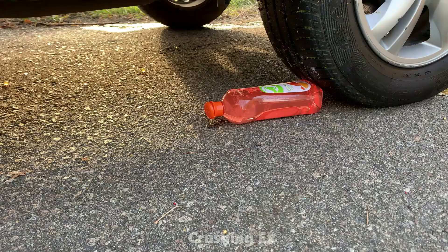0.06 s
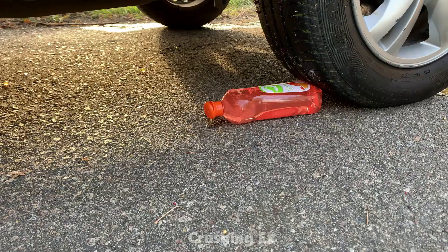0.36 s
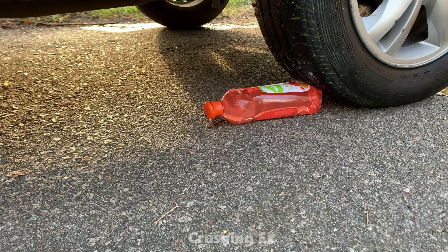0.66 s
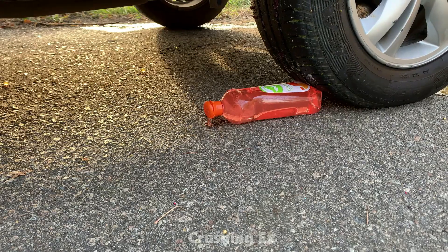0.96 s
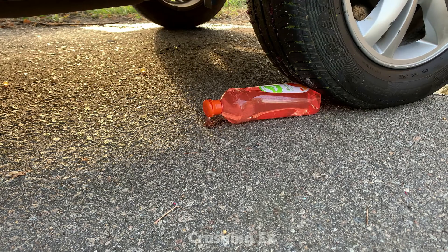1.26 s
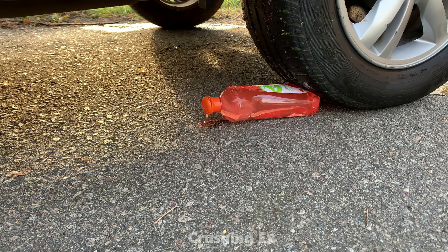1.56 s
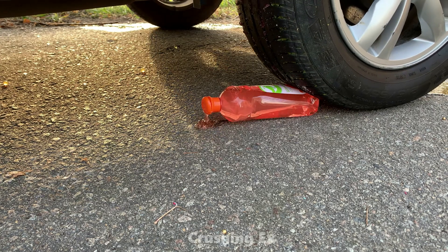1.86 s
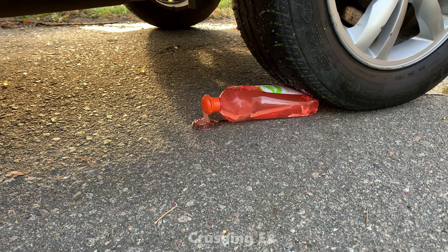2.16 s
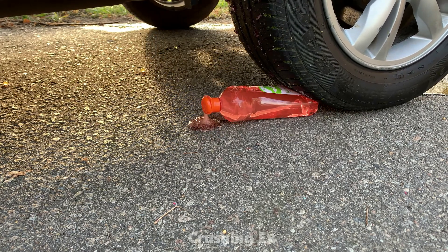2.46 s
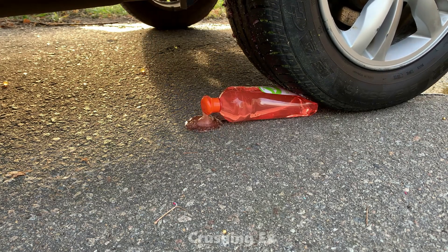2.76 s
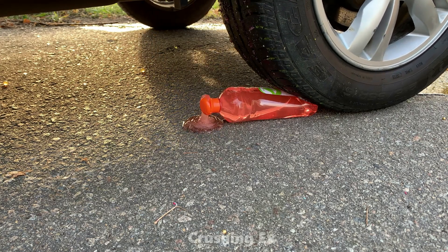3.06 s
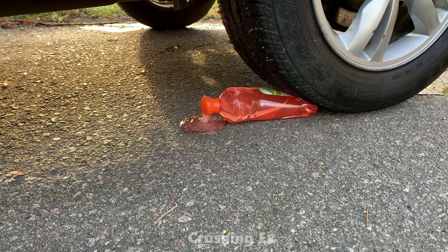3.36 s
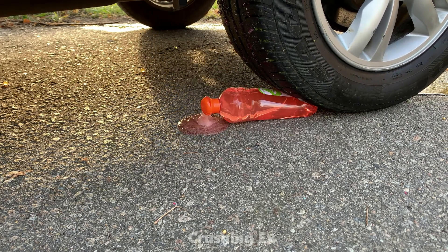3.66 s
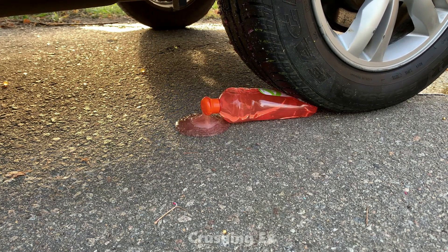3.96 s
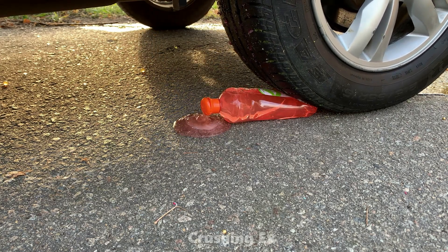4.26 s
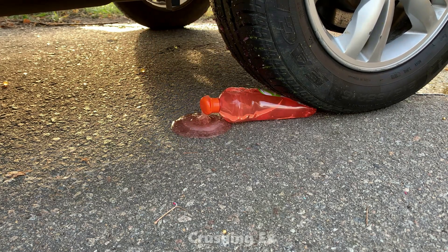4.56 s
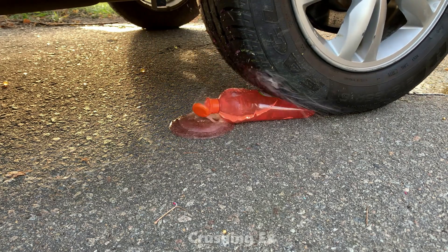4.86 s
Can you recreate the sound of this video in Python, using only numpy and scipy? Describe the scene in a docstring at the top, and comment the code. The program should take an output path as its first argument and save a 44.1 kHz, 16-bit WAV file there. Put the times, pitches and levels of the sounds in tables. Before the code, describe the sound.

A plastic bottle crackles under a slow tyre outdoors, fizzing at the cap before bursting into spray, over a quiet, squeaky idling engine.

```python
"""A car idles on asphalt in light wind, its engine rasping once per crank turn.
From 0.5 s it creeps onto a full plastic bottle: the wall buckles in sharp snaps, the shell scrapes
and creaks. From 1.65 s drink fizzes out past the cap in three bouts and glugs,
while the engine belt squeals and chirps in time with the crank. Near 4.8 s the seal gives way
and the spray splashes on the road."""
import sys
import numpy as np
from scipy import signal
from scipy.fft import rfft, irfft
from scipy.io import wavfile

SR = 44100
rng = np.random.default_rng(int(sys.argv[2]) if len(sys.argv) > 2 else 0)


def generate_wav(signal):
    """Clip the signal to [-1, 1] and save it as 16-bit WAV at the path in sys.argv[1]."""
    frames = np.transpose(np.atleast_2d(signal))
    scaled = np.clip(frames, -1, 1) * 32767
    pcm = np.round(scaled).astype(np.int16)
    wavfile.write(sys.argv[1], SR, pcm)


N = 225331
T = np.arange(N) / SR
CRANK_HZ, CRANK_LAG_S = 24.04, .021
TOP_HZ = 15900

# wall snaps: start_s, crack_db, low_panel_db, high_panel_db, ribs_db, crack_t60_s, nearest_rib_hz
WALL_SNAPS = [(0.5359, -48, -56.5, -56, -58, 0.011, 5400), (1.468, -70, -74, -80, -49, 0.022, 4400),
              (.912, -42, -54, -49, -43, 0.0064, 4700), (1.2635, -33, -45, -86, -33.5, 0.0044, 4500),
              (1.2865, -39, -50, -80, -38, 0.0067, 6300), (1.487, -36.5, -47.5, -89, -36.5, 0.008, 5940),
              (1.5416, -40.5, -57, -79, -38, 0.012, 6200), (1.6133, -30, -47, -32.5, -31, 0.042, 5900),
              (1.68, -44.5, -62, -52, -49, 0.046, 6200), (2.3354, -27, -56, -38, -33.5, 0.013, 5000),
              (2.7591, -19, -21, -20, -34.5, 0.055, 7300), (3.06, -36.5, -31.5, -44.5, -25, 0.026, 4220),
              (4.6858, -20, -65, -48, -25, 0.012, 5670)]
# wall panel and moulded rib modes: pitch_hz, t60_s, level_db
LOW_PANEL_MODES = [(650, 0.032, -35), (839, .04, -32.5), (1040, 0.044, -6.5), (1211, .06, 1.5),
                   (1312, .045, -10.5), (1452, 0.16, -13.5), (1660, 0.18, -26)]
HIGH_PANEL_MODES = [(2290, 0.041, 0), (2382, 0.045, -0.5), (2284, 0.079, -13), (2580, 0.076, -6),
                    (2720, 0.075, -16.5), (3274, 0.13, -15), (3890, 0.094, -14)]
RIB_MODES = [(4190, 0.023, -8), (4530, .04, -5.5), (4840, 0.022, 1), (5315, 0.036, 2.5), (6050, 0.023, 0.5),
             (6460, 0.08, -3.5), (8170, .03, -12.5)]
# crack spectrum: freq_hz, level_db
CRACK_SPECTRUM = [(400, -15.5), (900, -12.5), (3300, -7.5), (4400, 10), (6000, 11), (7500, 15),
                  (8700, -11.5), (15000, -69.5)]
# bottle slipping under the tyre: peak_s, level_db, rise_s, fall_s
SLIP_SWELLS = [(.54, -69, .15, 0.54), (.93, -59, .02, 1), (1.02, -49.5, .08, 0.2), (1.14, -56.5, .05, 0.16),
               (1.31, -59, .03, 0.091), (1.48, -64, .02, 0.26), (1.64, -62.5, .03, 0.17),
               (2.345, -53.5, .04, 0.32), (2.8, -45.5, .03, 0.2), (3.22, -57.5, .3, 0.96),
               (3.98, -62.5, .25, 0.73), (4.02, -53.5, 0.016, 0.086), (4.72, -57, .06, 0.73)]
# creaks of the loaded shell: peak_s, level_db
CREAK_SWELLS = [(.93, -53.5), (1.01, -47), (2.81, -39)]
# shell resonances: pitch_hz, width_hz, level_db
CREAK_MODES = [(783, 26, -3.5), (1316, 14, 2), (1486, 120, -3.5), (1790, 33, -7.5), (1863, 30, 1),
               (3580, 240, -3)]
# wet rubber on the wall: peak_s, level_db, rise_s, fall_s, pitch_hz
RUB_SWELLS = [(2.34, -54, .04, 0.065, 2460), (2.42, -63.5, 0.076, 0.17, 2870),
              (3.25, -56, 0.63, 0.44, 2690), (4.07, -62, 0.1, .12, 2400),
              (4.721, -50.5, 0.053, 0.082, 2800), (4.9, -51, 0.088, 0.16, 2750)]

# cap leaks, one list per bout: time_s, level_db, mist_relative_db
LEAK_BOUTS = [
    [(1.65, -63, -9), (1.694, -52, -9.5), (1.884, -64, -2), (1.948, -57.5, -2.5), (2.042, -69.5, 6),
     (2.146, -55, -8.5), (2.152, -47.5, -14), (2.24, -52.5, -5), (2.344, -43.5, -16.5), (2.59, -42, -9),
     (2.745, -63, -7)],
    [(3.085, -61, -13), (3.093, -46, -29), (3.117, -32.5, -21.5), (3.171, -39.5, -14), (3.225, -34, -17.5),
     (3.235, -42, -12.5), (3.289, -38.5, -18.5), (3.327, -46, -11), (3.375, -41.5, -15.5), (3.427, -58, -8),
     (3.6, -93, -14)],
    [(4.44, -75, 8.5), (4.452, -85, 8), (4.526, -47, -8.5), (4.698, -39, -12.5), (4.766, -55.5, -8),
     (4.832, -33, -4), (4.85, -40, -17), (4.91, -32, -9), (5.0, -48, -9), (5.052, -40, -4),
     (5.11, -42.5, -10)],
]
# whistle of the cap gap: time_s, pitch_hz, relative_to_jet_db
WHISTLE_CURVE = [(1.65, 6220, -5), (2.18, 5620, 8.5), (2.5, 5210, 2.5), (2.6, 5070, -14.5),
                 (3.1, 5990, 1.5), (3.22, 6010, -22.5), (4.52, 5300, -9), (5.11, 6400, -30)]
# jet, fine mist and atomised spray spectra: freq_hz, level_db
JET_SPECTRUM = [(1000, -32), (2500, -30.5), (3500, -46.5), (4400, -9), (5300, 2), (6100, 5.5), (7200, 2),
                (8400, -17), (10000, -19), (16000, -49)]
MIST_SPECTRUM = [(6000, -34), (8700, -37), (9700, 3), (11000, 7.5), (12500, -3.5), (13800, -9),
                 (15000, -48.5), (16000, -41.5)]
SPRAY_SPECTRUM = [(2000, -37.5), (4500, -8.5), (8500, -4.5), (10500, 0), (12700, 2.5), (15000, -7),
                  (16000, -26)]
# spits from the cap: start_s, jet_db, mist_relative_db
CAP_SPITS = [(2.155, -46.5, 9), (2.462, -27.5, -15), (2.5163, -29, -22), (3.0948, -30.5, -33),
             (3.122, -33, -32), (3.137, -27, -31), (3.2138, -27, -27.5), (4.803, -23.5, 4.5),
             (4.82, -14, -8.5), (4.83, -13, 3), (4.8426, -20, -12), (4.904, -21, -6)]
# spray leaving the seal, and landing on the road: time_s, level_db
SPRAY_CURVE = [(4.75, -52), (4.8, -36), (4.835, -34.5), (4.9, -35.5), (4.96, -45), (5.02, -49.5),
               (5.11, -48.5)]
SPLASH_CURVE = [(4.698, -83), (4.718, -57.5), (4.823, -46), (4.853, -30), (4.871, -38), (4.94, -34),
                (4.95, -41), (5.092, -42.5), (5.11, -44)]
# puddle patter spectrum: freq_hz, level_db
PUDDLE_SPECTRUM = [(150, -10), (330, -35), (450, -33), (800, 4), (1300, -9), (1900, 23.5), (2400, -10),
                   (3300, -1), (4500, 11), (8000, -23)]
# air pocket between tyre, bottle and road: pitch_hz, width_hz, level_db
POCKET_MODES = [(603, 32, -5.5), (908, 37, 6.5), (1155, 24, 5), (1487, 88, 9.5), (1689, 37, 8),
                (2170, 15, 4.5)]
# glugs of the drink: peak_s, level_db, pitch_hz, length_s
DRINK_GLUGS = [(3.262, -49, 204.7, 0.029), (3.35, -61, 184, 0.12), (3.95, -66, 229.6, 0.13),
               (4.10, -65.5, 253.6, 0.047), (4.265, -56.5, 230.4, 0.04), (4.32, -61, 190.6, 0.081),
               (4.87, -57, 119.6, 0.072), (5.04, -56, 274.2, 0.054), (5.085, -55, 191, 0.071)]

# belt chirps and a few other squeaks: peak_s, level_db, pitch_hz
SQUEAKS = [(1.14, -49, 3440), (1.31, -46.5, 3350), (1.886, -51, 1716), (2.018, -54, 1520),
           (2.10, -49.5, 1510), (2.183, -52.5, 1530), (2.345, -53, 2144), (2.382, -39.5, 1044),
           (2.478, -44, 1925), (2.553, -47.5, 1790), (2.809, -34, 1850), (2.976, -35, 1854),
           (3.019, -44.5, 1800), (3.139, -43.5, 1814), (3.181, -45.5, 1800), (3.304, -33.5, 1839),
           (3.392, -37, 1758), (3.476, -36.5, 1870), (3.517, -37.5, 1815), (3.639, -42, 1844),
           (3.68, -43, 1807), (3.813, -50, 1896), (3.85, -46.5, 1890), (3.965, -55.5, 2057),
           (4.015, -45, 1740), (4.219, -50, 1753), (4.519, -47, 1504), (4.68, -47.5, 2164),
           (4.755, -48.5, 1028)]
# exhaust hum as the engine labours against the bottle: peak_s, level_db
HUM_SWELLS = [(.58, -68), (1.0, -65.5), (1.21, -59.5), (2.8, -60), (3.3, -67.5), (3.95, -65.5),
              (4.85, -48.5), (5.08, -57)]
# friction rasp and engine bay drone spectra: freq_hz, level_db
RASP_SPECTRUM = [(500, -20), (900, -1.5), (1300, -1), (1850, 2), (2200, -6.5), (3400, -7.5), (4200, 1),
                 (5600, -3.5), (7200, -2.5), (8800, -23.5), (14000, -35)]
DRONE_SPECTRUM = [(53, -44.5), (90, 1.5), (312, -8.5), (403, 3.5), (453, -10.5), (490, 0), (997, 0),
                  (1480, 4), (1630, -4.5), (1840, 3.5), (2330, -9), (5990, -17.5), (10000, -52),
                  (13000, -84.5), (22000, -120)]
# engine bay resonances of rasp and drone: pitch_hz, width_hz, level_db
RASP_RESONANCES = [(1346, 13, -8.5), (1773, 18, 2), (2434, 85, -12), (2900, 29, -5.5), (3120, 38, -4),
                   (3511, 130, -1), (4400, 100, -7), (4550, 31, -15), (5440, 250, -8.5)]
DRONE_RESONANCES = [(435, 10, -19.5), (767.6, 10, -2.5), (1282, 49, -7.5), (1472, 35, 3), (1810, 85, -1.5)]
# bay drone and belt squeal swells: peak_s, level_db, rise_s, fall_s
BAY_SWELLS = [(.55, -63.5, 0.38, 0.58), (2.85, -59.5, .2, 0.21)]
BELT_SWELLS = [(1.9, -66, 0.026, 0.94), (2.4, -71.5, 0.45, 1.7), (3.18, -47, 0.61, 0.5),
               (3.85, -62.5, 0.11, 0.54), (4.6, -57.5, 0.2, 2.6)]
# wind buffet spectrum: freq_hz, level_db
WIND_SPECTRUM = [(5, 7.5), (15, 2.5), (30, 4), (60, -24), (120, -26), (400, -52), (2000, -73)]
# gusts on the microphone: peak_s, level_db
GUST_SWELLS = [(.62, -65.5), (.97, -54), (1.19, -55.5), (2.64, -60.5), (2.82, -59), (3.9, -47.5),
               (4.02, -45.5), (4.2, -60), (4.67, -43), (4.85, -41)]


def snaps(lead_in_s=.01, lead_in_db=-15, full_snap_db=-19, size=8192):
    """The wall buckles: a crease cracks, panels and nearby ribs ring, damped by the drink."""
    out = np.zeros(N)
    build, slow_build = (1 - np.exp(-2 * (T[:size] / rise_s) ** 2) for rise_s in (.0013, .0062))
    for start_s, crack_db, low_db, high_db, ribs_db, t60_s, rib_hz in WALL_SNAPS:
        ribs = [(hz, decay_s, db - 35 * abs(np.log2(hz / rib_hz))) for hz, decay_s, db in RIB_MODES]
        # a faint, soft lead-in comes just before each sharp snap
        for onset_s, attack in [(start_s - lead_in_s, undb(lead_in_db) * slow_build), (start_s, build)]:
            burst = undb(crack_db) * rng.standard_normal(size) * fade(t60_s, size) * attack
            rings = undb(low_db) * ring(LOW_PANEL_MODES, size)
            rings += undb(high_db) * ring(HIGH_PANEL_MODES, size)
            rings += undb(ribs_db) * ring(ribs, size)
            add(out, onset_s, lowpass(colour(burst, CRACK_SPECTRUM) + rings * attack, 8000, order=6))
        # weaker snaps are duller
        force_db = crack_db - full_snap_db
        reach_hz = np.clip(TOP_HZ + 240 * force_db, 8000, TOP_HZ)
        treble = colour(burst * fade(0.023, size), SPRAY_SPECTRUM)
        add(out, start_s, undb(3 + 0.89 * force_db) * lowpass(treble, reach_hz, order=8))
    return out


def ring(modes, size):
    """Decaying wall modes of alternating sign; each buckle detunes them a little."""
    out = np.zeros(size)
    for i, (hz, t60_s, db) in enumerate(modes):
        hz *= 1 + 0.019 * rng.standard_normal()
        out += (-1) ** i * undb(db) * fade(t60_s, size) * np.sin(2 * np.pi * hz * T[:size])
    return out


def scrapes():
    """The trembling tyre shoves the bottle over grit, one step per crank turn; the shell creaks."""
    grit = droplets(rate_hz=3000, spread_db=3) + undb(0.5) * rng.standard_normal(N)
    grit = grit * throb(depth_db=8.5, lag_s=-0.0011) * undb(0.99 * walk(24.37))
    creak = lowpass(bank(grit, CREAK_MODES), 4000, order=4)
    creak *= swells(CREAK_SWELLS, rise_s=0.034, fall_s=0.075)
    return underbody(grit) * swells(SLIP_SWELLS) + creak


def rubbing(width_hz=560):
    """Wet rubber sticks and slips on the wall, each rub a narrow squelch at its own pitch."""
    slips = droplets(rate_hz=1500, spread_db=5) * throb(depth_db=4, lag_s=.001)
    out = np.zeros(N)
    for *shape, hz in RUB_SWELLS:
        squelch = resonate(resonate(slips, hz, width_hz), hz, width_hz)
        out += unit(squelch) * swell(*shape)
    return out


def leak():
    """Drink and air sputter through the cap thread; the gap whistles roughly, with its octave."""
    whistle_hz, whistle_db = curves(WHISTLE_CURVE)
    sputter = droplets(rate_hz=2000, spread_db=3.5) + undb(-8.5) * rng.standard_normal(N)
    sputter = unit(sputter * undb(2.07 * walk(110)))
    whistle = glide(sputter, whistle_hz * (1 + 0.024 * walk(40)), width_hz=750)
    octave = glide(sputter, 2 * whistle_hz * (1 + 0.045 * walk(25)), width_hz=1100)
    jet = blend(colour(sputter, JET_SPECTRUM), whistle, whistle_db)
    mist = unit(colour(sputter, MIST_SPECTRUM) + undb(whistle_db - 7) * octave)
    out = np.zeros(N)
    for bout in LEAK_BOUTS:
        level_db, mist_db = curves(bout)
        out += during(bout) * undb(level_db) * (jet + undb(mist_db) * mist)
    return scatter(out, share_db=-1, t60_s=0.025)


def spits(length_s=0.00096, size=1024):
    """Larger slugs of drink tear through the seal."""
    out = np.zeros(N)
    for start_s, jet_db, mist_db in CAP_SPITS:
        burst = rng.standard_normal(size) * np.exp(-(T[:size] / length_s) ** 4)
        jet, mist = colour(burst, JET_SPECTRUM), colour(burst, MIST_SPECTRUM)
        spit = jet / abs(jet).max() + undb(mist_db) * mist / abs(mist).max()
        add(out, start_s, undb(jet_db) * spit)
    return out


def spray():
    """The burst seal atomises the drink into a bright crackling cloud."""
    cloud = colour(droplets(rate_hz=3900, spread_db=6), SPRAY_SPECTRUM)
    return cloud * undb(curves(SPRAY_CURVE)[0]) * during(SPRAY_CURVE)


def splash():
    """Spray patters and gurgles into the puddle, ringing the pocket under the tyre."""
    drops = unit(droplets(rate_hz=1200, spread_db=0) * undb(3 * walk(60)))
    patter = undb(-9.5) * colour(drops, PUDDLE_SPECTRUM)
    pocket = undb(-5) * bank(drops, POCKET_MODES)
    gurgle = undb(-14.5) * bubbles()
    return (patter + pocket + gurgle) * undb(curves(SPLASH_CURVE)[0]) * during(SPLASH_CURVE)


def bubbles(count=60, t60_s=0.13, size=2048):
    """Bubbles trapped in the puddle ring briefly, rising in pitch."""
    out = np.zeros(N)
    start_s, end_s = SPLASH_CURVE[0][0], SPLASH_CURVE[-1][0]
    for when, pitch, strength in rng.random((count, 3)):
        hz = 620 * 3.4 ** pitch * (1 + 1.7 * T[:size])
        bubble = undb(9.6 * strength) * fade(t60_s, size) * tone(hz)
        add(out, start_s + when * (end_s - start_s), bubble)
    return out / np.std(out[T > start_s])


def glugs():
    """The drink glugs in low, hollow, wavering tones."""
    return blips(DRINK_GLUGS, waver=0.2, rough_db=-0.5)


def fizz(level_db=-95):
    """From the first leak on, tiny bubbles pop in the spilt drink."""
    pops = droplets(rate_hz=300, spread_db=4)
    spilt = T > LEAK_BOUTS[0][0][0]
    return (colour(pops, MIST_SPECTRUM) + colour(pops, JET_SPECTRUM)) * undb(level_db) * spilt


def squeaks(loud_db=-35.5, loud_length_s=0.016, drag_per_db=0.027):
    """Short chirps, mostly the belt near 1.8 kHz in time with the crank; softer ones last longer."""
    rows = [(peak_s, db, hz, loud_length_s * np.exp(drag_per_db * (loud_db - db)))
            for peak_s, db, hz in SQUEAKS]
    return blips(rows, waver=0.02, rough_db=2)


def engine(hum_db=-76.5, rasp_db=-81.5, drone_db=-74.5):
    """Two firings per turn hum in the exhaust; belt rasp, squeal and bay drone pulse once per turn."""
    turn = crank(0)
    hum = np.sin(2 * turn) + undb(-7.5 + 3 * walk(5)) * np.sin(3 * turn) + undb(-19) * np.sin(5 * turn)
    hum *= np.hypot(undb(hum_db), swells(HUM_SWELLS, rise_s=0.26, fall_s=0.35))
    friction = rng.standard_normal(N) * throb(depth_db=7, lag_s=-.001) * undb(2 * walk(20))
    rasp = underbody(friction) * undb(rasp_db)
    air = unit(rng.standard_normal(N) * throb(depth_db=4.5, lag_s=-0.00055))
    drone = lowpass(colour(air, DRONE_SPECTRUM) + undb(-2) * bank(air, DRONE_RESONANCES), 4000, order=2)
    drone *= np.hypot(undb(drone_db), swells(BAY_SWELLS))
    squeal = resonate(resonate(rng.standard_normal(N), 1770, 190), 1645, 200)
    squeal = unit(squeal * throb(depth_db=3, lag_s=0.00065)) * swells(BELT_SWELLS)
    return hum + rasp + drone + squeal


def crank(lag_s):
    """Delayed crankshaft angle in radians."""
    return 2 * np.pi * CRANK_HZ * (T - CRANK_LAG_S - lag_s)


def throb(depth_db, lag_s):
    """Lopsided gain pulse, once per crank turn."""
    turn = crank(lag_s)
    return undb(depth_db * (np.cos(turn) + 0.3 * np.cos(2 * turn + .6)))


def wind(breeze_db=-76):
    """Slow eddies push on the microphone: a light breeze with gusts."""
    strength = np.hypot(undb(breeze_db), swells(GUST_SWELLS, rise_s=0.14, fall_s=0.32))
    return colour(rng.standard_normal(N), WIND_SPECTRUM, size=16384) * strength


def underbody(friction):
    """Friction noise from under the car; the advancing wheel shades its treble."""
    rasp = scatter(colour(friction, RASP_SPECTRUM), share_db=15.5, t60_s=0.069)
    rasp = unit(rasp + undb(8.5) * bank(friction, RASP_RESONANCES))
    shade = np.interp(T, [3.45, 3.68], [0, .92])
    return (1 - shade) * lowpass(rasp, 8070, order=8) + shade * lowpass(rasp, 4130, order=14)


def scatter(x, share_db, t60_s, size=2048):
    """Quick reflections between road, tyre and underbody comb the spectrum."""
    echoes = rng.standard_normal(size) * fade(t60_s, size) * (T[:size] > .001)
    return blend(x, convolve(x, echoes), share_db)


def driveway(x, t60_s=0.47, wet_db=-13, size=32768):
    """Direct sound plus duller scattered echoes from nearby walls."""
    tail = rng.standard_normal(size) * fade(t60_s, size) * (1 - np.exp(-T[:size] / 0.013))
    tail = colour(tail, [(200, 7), (600, 6), (1500, 1), (4000, -4), (8000, -7), (15000, -4)])
    return x + undb(wet_db) * convolve(x, tail)


def droplets(rate_hz, spread_db):
    """Randomly timed tiny impacts; spread_db makes a few far larger."""
    sizes = undb(spread_db * np.minimum(rng.exponential(size=N), 4))
    return unit((rng.random(N) < rate_hz / SR) * sizes * rng.choice([-1, 1], N))


def blips(table, waver, rough_db):
    """Short tones that swell and die, unsteady in pitch and strength."""
    out = np.zeros(N)
    drift = waver * walk(700)
    grain = unit(undb(rough_db * walk(450)))
    for peak_s, db, hz, length_s in table:
        near = abs(T - peak_s) < 2 * length_s
        envelope = np.exp(-3 * ((T[near] - peak_s) / length_s) ** 2) * grain[near]
        out[near] += undb(db) * envelope * tone(hz * (1 + drift[near]))
    return out


def tone(hz):
    """Sine following a pitch curve."""
    return np.sin(2 * np.pi * np.cumsum(hz) / SR)


def swell(peak_s, db, rise_s, fall_s):
    """Gain that climbs 20 dB per rise_s to its peak, then drops 20 dB per fall_s."""
    return undb(db - 20 * np.maximum((peak_s - T) / rise_s, (T - peak_s) / fall_s))


def swells(table, **shape):
    """Power sum of one swell per row."""
    return np.sqrt(sum(swell(*row, **shape) ** 2 for row in table))


def curves(table):
    """Each column interpolated over the first, time_s."""
    time_s, *columns = np.transpose(table)
    return [np.interp(T, time_s, column) for column in columns]


def during(table):
    """1 over a table's time span, fading quickly outside it."""
    start_s, end_s = table[0][0], table[-1][0]
    return np.interp(T, [start_s - .03, start_s, end_s, end_s + 0.13], [0, 1, 1, 0])


def walk(rate_hz):
    """Random wander with a spread near 1."""
    knots = rng.standard_normal(int(N / SR * rate_hz) + 2)
    return np.interp(T * rate_hz, np.arange(len(knots)), knots)


def fade(t60_s, size):
    """Exponential decay, 60 dB per t60_s."""
    return np.exp(-np.log(1000) * T[:size] / t60_s)


def colour(x, spectrum, size=2048):
    """Minimum-phase filter shaped by (freq_hz, level_db) points."""
    hz, db = np.transpose(spectrum)
    bins_hz = np.maximum(np.fft.rfftfreq(size, 1 / SR), 1)
    gain = undb(np.interp(np.log(bins_hz), np.log(hz), db))
    cepstrum = irfft(np.log(gain))
    cepstrum[1:size // 2] *= 2
    cepstrum[size // 2 + 1:] = 0
    return convolve(x, irfft(np.exp(rfft(cepstrum))))


def convolve(x, response):
    """Apply a response scaled to unit energy."""
    return signal.fftconvolve(x, response / np.linalg.norm(response))[:len(x)]


def resonate(x, hz, width_hz):
    """One resonance, gain 1 at its centre."""
    return signal.lfilter(*signal.iirpeak(hz, hz / width_hz, fs=SR), x)


def bank(x, modes):
    """Parallel resonances at rms 1."""
    return unit(sum(undb(db) * unit(resonate(x, hz, width_hz)) for hz, width_hz, db in modes))


def glide(x, hz, width_hz):
    """Moving resonance at rms 1: shift down by its pitch, smooth, shift back."""
    spin = np.exp(2j * np.pi * np.cumsum(hz) / SR)
    return unit((spin * lowpass(x / spin, width_hz / 2, order=4)).real)


def lowpass(x, hz, order):
    """Treble cut."""
    return signal.sosfilt(signal.butter(order, hz, fs=SR, output="sos"), x)


def blend(x, other, share_db):
    """Constant-power mix."""
    return (x + undb(share_db) * other) / np.hypot(1, undb(share_db))


def add(out, start_s, sound):
    """Mix a sound in at start_s."""
    start = max(int(start_s * SR), 0)
    out[start:start + len(sound)] += sound[:max(N - start, 0)]


def undb(db):
    """Decibels to gain."""
    return 10 ** (np.asarray(db) / 20)


def unit(x):
    """Scale to rms 1."""
    return x / np.sqrt(np.mean(x ** 2))


def scene():
    """Bottle, drink, car and wind at one microphone."""
    bottle = snaps() + scrapes() + rubbing()
    chirps = squeaks()
    drink = leak() + spits() + spray() + splash() + fizz() + glugs()
    return (driveway(bottle + chirps + drink) + engine() + wind())[None]


def record(dry):
    """Short fade-in, faint hiss, steep cut above TOP_HZ."""
    fade_in = undb(np.interp(T, [0, 0.2], [-11, 0]))
    hiss = undb(-92.5) * rng.standard_normal(N)
    return signal.sosfilt(signal.ellip(8, .2, 70, TOP_HZ, fs=SR, output="sos"), dry * fade_in + hiss)


dry = scene()
out = record(dry)
generate_wav(out)
```